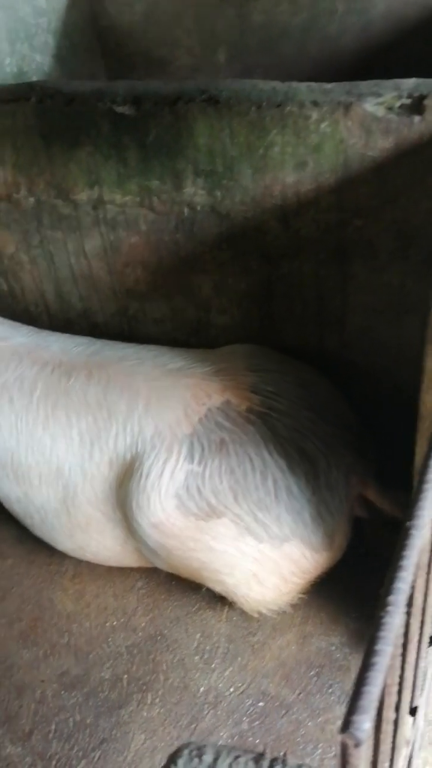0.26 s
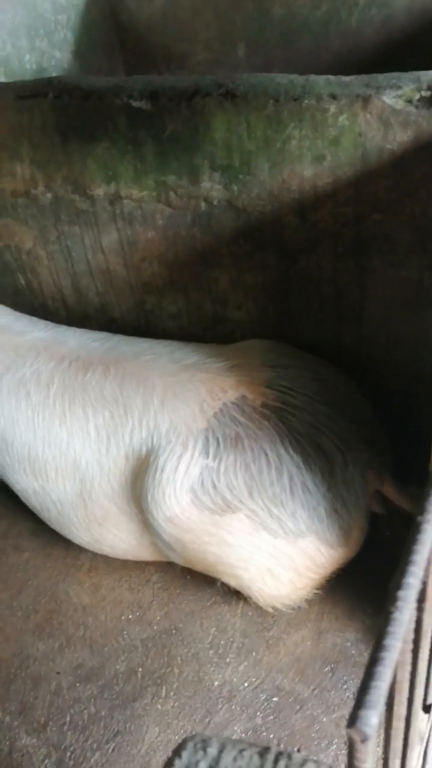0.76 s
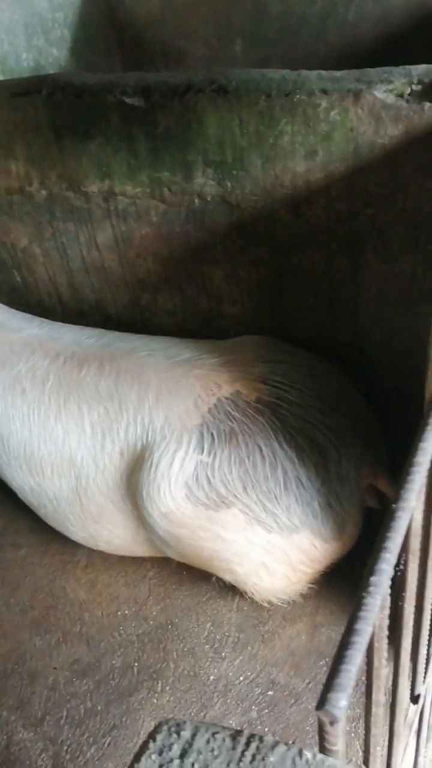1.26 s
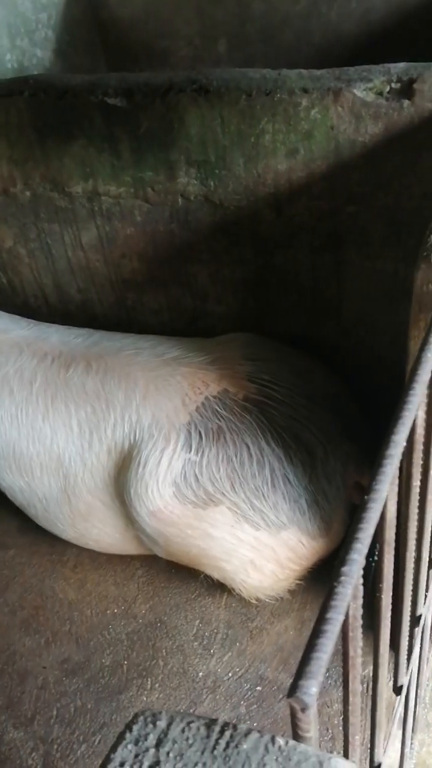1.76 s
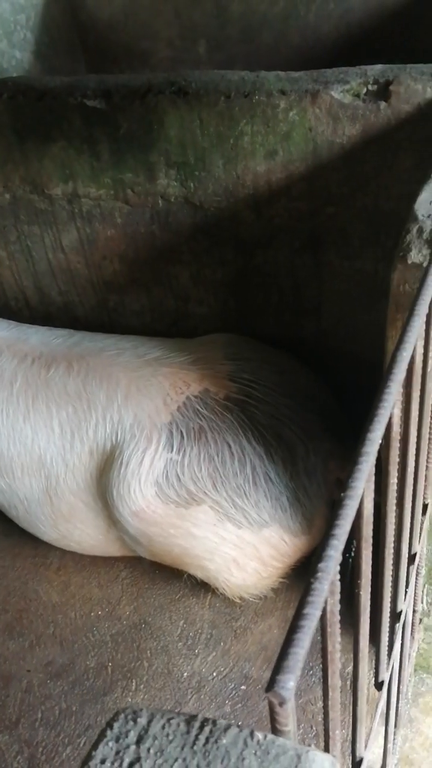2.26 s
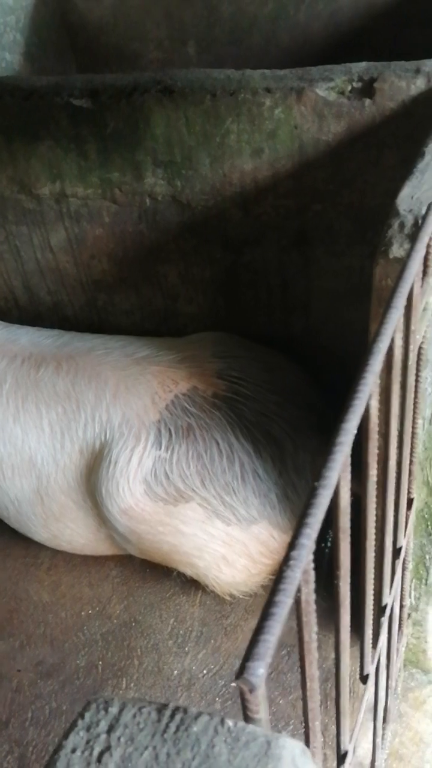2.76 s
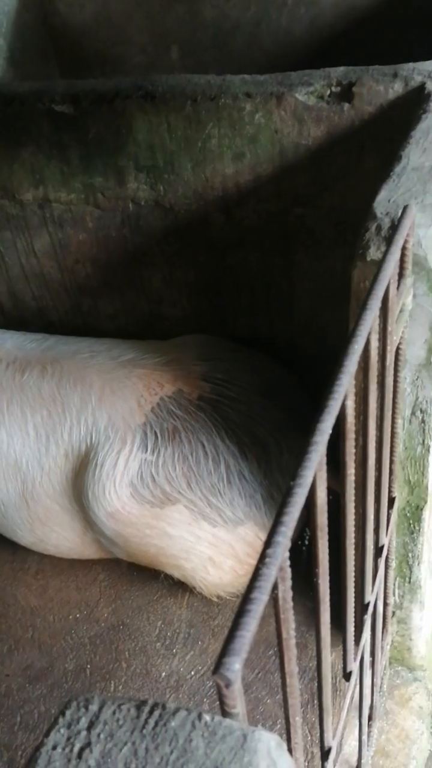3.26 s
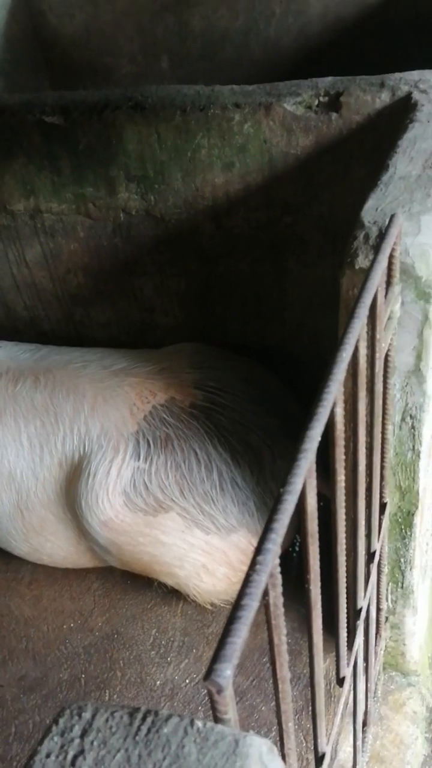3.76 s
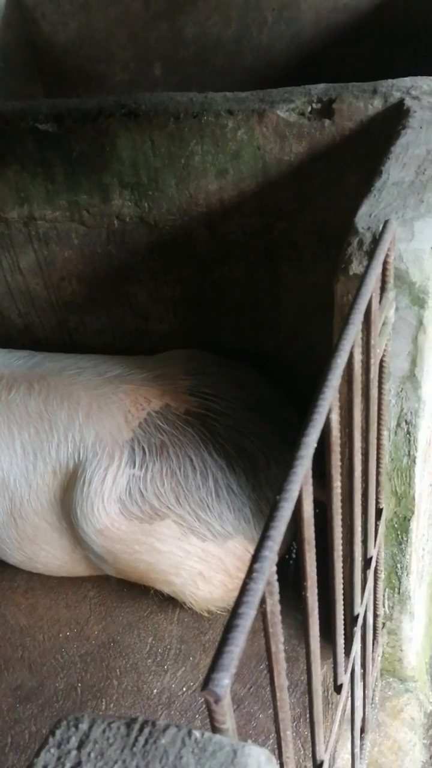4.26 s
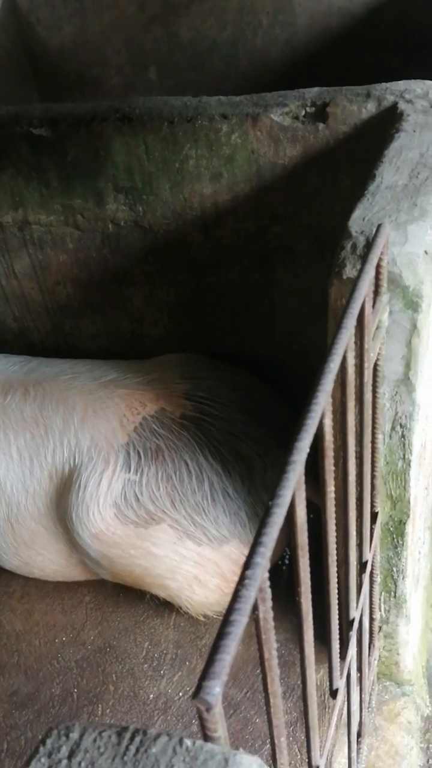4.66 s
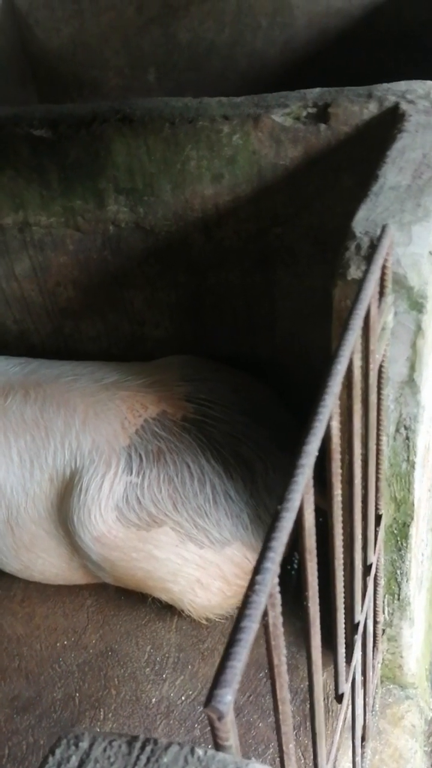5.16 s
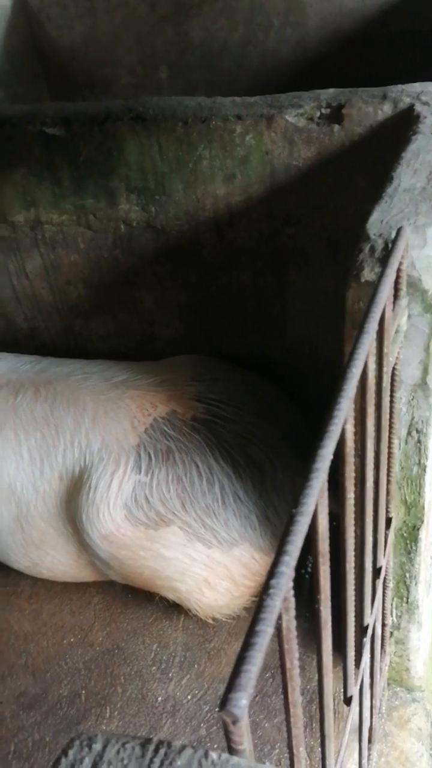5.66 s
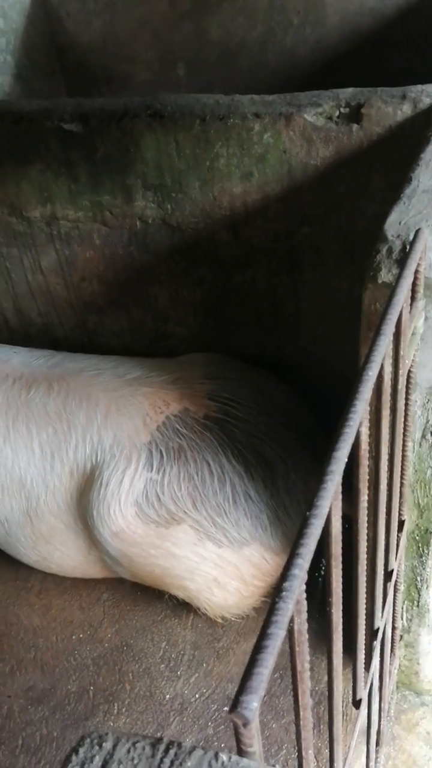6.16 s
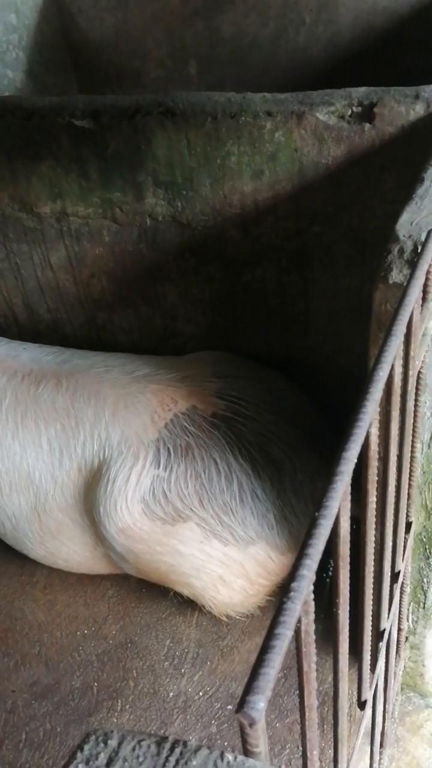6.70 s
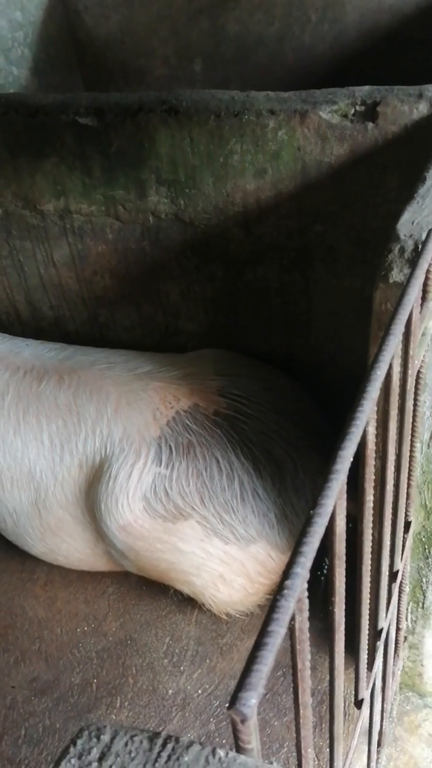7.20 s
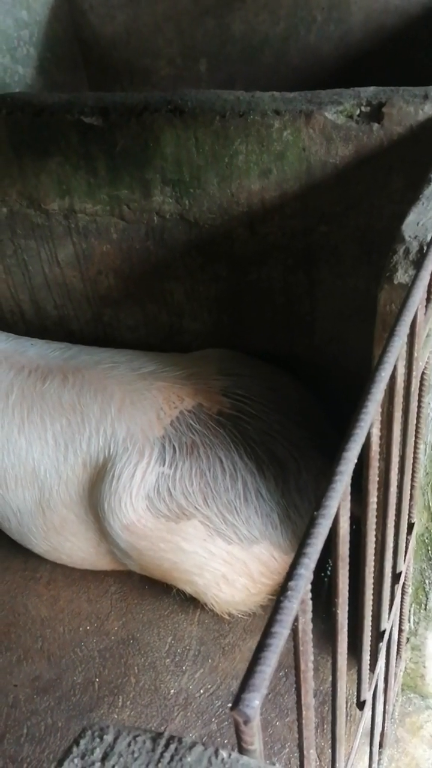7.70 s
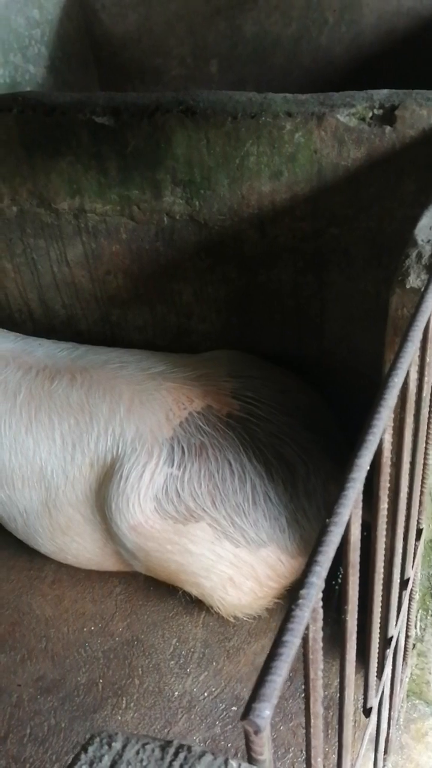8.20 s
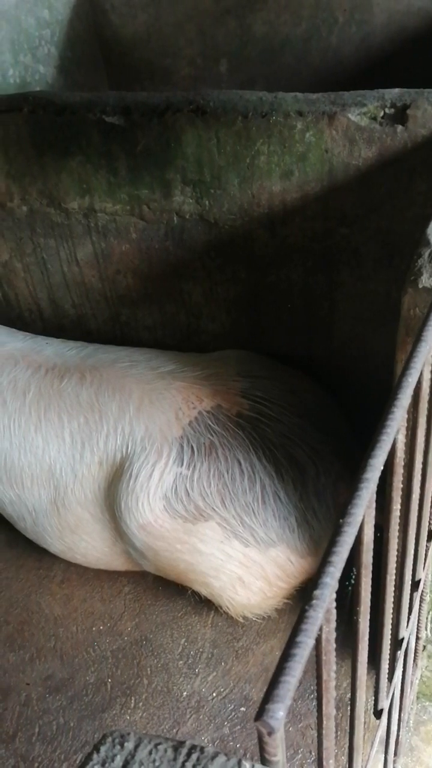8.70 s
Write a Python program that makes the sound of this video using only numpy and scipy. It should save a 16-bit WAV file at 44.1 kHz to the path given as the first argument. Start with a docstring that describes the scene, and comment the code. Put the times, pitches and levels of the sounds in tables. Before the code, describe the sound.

A high, crisp hiss of running water fills a concrete animal shed from start to finish, swelling gently about every three quarters of a second, with patter, dull splashing, sharp drops and small spits. Beneath is a low, restless air wash. Wet smacks and hollow gliding gulps from neighbouring pens come in loose clusters, busiest around 2.3 to 4.3 and 6 to 8.7 seconds. The close pig gives a short rattling grunt at 1.0, a duller closed-mouth one with a slight hum at 1.5, and another open one at 6.6, together with a strong water surge and splat. Hoarse squeals sound far off at 1.2, 2.6 and 7.5, with a thin whistling cry near 3.4. At 7.6 a young pig makes a quick rising tonal grunt that sinks into an airy murmur. A prominent gulp follows at 8.3. Short concrete reverberation, wide phone stereo.

```python
"""In a bare concrete pen a pig grunts three times: slow throat flaps, built from air bursts, ring mouth and snout.
From the pens around come gliding gulps, noisy wet smacks and low rumbles, and late on a young pig's tonal grunt.
Wavering tones make squeals and a whistle far off. Clicks and noise make a surging stream, spits and drops;
filtered noise washes through the shed. A phone's two unlike microphone ports colour left and right."""
import sys
import numpy as np
from scipy import signal
from scipy.fft import rfft, irfft, next_fast_len
from scipy.io import wavfile
from scipy.ndimage import uniform_filter1d

SR = 44100
rng = np.random.default_rng(int(sys.argv[2]) if len(sys.argv) > 2 else 0)


def inscribe(sig):
    """Save sig as 16-bit PCM at rate SR to the path in sys.argv[1].

    A 1-D sig is mono; a 2-D sig holds one channel per row.
    Samples are clipped to [-1, 1] before scaling.
    """
    pcm = np.round(np.clip(np.atleast_2d(sig).T, -1, 1) * 32767)
    wavfile.write(sys.argv[1], SR, pcm.astype(np.int16))


N = 394254
T = np.arange(N) / SR

# Spray colour. Each row: frequency in Hz, gain in dB.
SPRAY_COLOUR = [(1500, -20.5), (3500, 0.5), (5000, 5), (8000, 0), (12000, -3.5), (16000, 6.5)]
# Colour of the small splats. Each row: frequency in Hz, gain in dB.
PATTER_COLOUR = [(2500, -26), (4500, 10), (5600, 6), (7000, 2.5), (9000, -4.5), (16000, -10.5)]
# Colour of the dull splashing. Each row: frequency in Hz, gain in dB.
SPLASH_COLOUR = [(900, -16), (1700, -7), (2150, 0), (3200, -1), (4000, -12.5), (7000, -30)]
# The stream surges about every three quarters of a second. Each row: crest in seconds, rise in dB.
SURGES = [(0.48, 5.5), (1.35, 4), (2.08, 6), (2.92, 5), (3.72, 4), (4.58, 5.5), (5.25, 1.5), (5.97, 2.5),
          (6.68, 9.5), (7.4, 5), (8.08, 5), (8.849, 5)]
# Course of the dull splashing. Each row: time in seconds, relative level in dB.
SPLASH_LEVEL = [(0, -59), (0.1, -53), (0.55, -49), (0.72, -51), (1.5, -49), (1.75, -54.5), (2.65, -48.5),
                (2.85, -50.5), (3.2, -53.5), (4.45, -51), (4.8, -54.5), (5.35, -52), (5.55, -47),
                (5.85, -53), (6.55, -50), (7.08, -52.5), (7.45, -48), (7.75, -50.5), (8.22, -47),
                (8.5, -54)]
# Colour of the shed's air. Each row: frequency in Hz, gain in dB.
SHED_COLOUR = [(15, -8), (45, 6.5), (130, 3.5), (250, 0), (420, -3.5), (550, -11.5), (760, 1.5),
               (1050, -4.5), (1700, -7.5), (3500, -7.5), (9000, -54)]
# Hollow resonances of the pens. Each row: frequency in Hz, width in Hz, middle level in dB.
SHED_RINGS = [(545, 36, -68), (871, 26, -73.5), (1147, 48, -72.5), (1380, 40, -69), (2114, 96, -72.5)]
# Wet smacks, slurps and snuffles. Each row: start in seconds, relative level in dB, centre in Hz,
# nominal length in seconds, width as a share of the centre.
SMACKS = [(0, -51, 3000, 0.017, 0.54), (.48, -60, 2900, .14, .45), (.585, -54.5, 1000, 0.049, 0.55),
          (.845, -54.5, 2220, 0.11, 0.92), (1.22, -48, 580, 0.1, 1), (1.276, -45.5, 1925, .026, 0.11),
          (1.305, -54.5, 303, 0.062, 0.31), (1.98, -56.5, 2330, 0.055, 0.35),
          (2.095, -60, 2040, 0.06, 0.34), (2.25, -52.5, 1340, 0.044, 0.55), (2.3, -55.5, 2680, 0.018, .15),
          (2.57, -56, 2970, 0.05, 0.087), (2.72, -57.5, 2090, 0.096, 0.11), (2.81, -57.5, 2330, 0.13, 0.23),
          (2.994, -49.5, 2280, .05, 0.31), (3.745, -58, 3230, 0.034, .1), (4.0, -59.5, 2160, .06, 0.16),
          (4.36, -57.5, 2380, .07, 0.22), (4.505, -51, 2780, 0.11, 0.41), (4.74, -59, 1060, 0.13, 0.56),
          (5.075, -54, 3150, 0.076, 0.27), (5.4, -57, 2400, 0.037, 0.27), (5.53, -60, 2070, 0.06, 0.17),
          (5.68, -58, 3140, 0.064, 0.34), (5.876, -55, 2800, .049, 0.32), (6.09, -60, 1370, 0.11, 0.21),
          (6.605, -54, 1110, 0.072, 0.2), (6.85, -48.5, 780, 0.061, 1), (6.853, -54, 1900, 0.087, 1),
          (7.401, -49.5, 2720, 0.042, 0.12), (8.168, -58, 2620, 0.17, 0.42),
          (8.527, -54.5, 1230, 0.027, 0.33), (8.535, -58.5, 2380, .07, 0.27)]
# Faint low rumbles. Each row: the same columns as the smacks.
RUMBLES = [(3.0, -52.5, 150, 0.082, .7), (5.25, -58, 104, 0.32, 0.43), (5.42, -53.5, 101, 0.16, 0.43),
           (8.775, -51, 92, 0.055, 0.58)]
# Bouts of feeding. Each row: start in seconds, end in seconds.
BOUTS = [(0.06, 1.02), (2.35, 3.7), (6.0, 7.1), (7.45, 8.8)]
# The main gulps. Each row: time in seconds, relative level in dB, mouth note in Hz at mid-glide,
# whole glide in octaves, squelch in dB against the note.
GULPS = [(.09, -47.5, 529, 0.028, -22), (.275, -42, 606, -0.33, -10), (.541, -42.5, 540, 0.014, -12),
         (.92, -42, 470, 0.18, 7), (1.995, -43, 575, -0.43, 5), (2.377, -39, 810, -0.26, 7),
         (2.398, -41, 545, 0.01, -11), (2.462, -44, 710, 0.27, 0), (2.51, -39, 700, 0.22, -10),
         (2.679, -43.5, 547, -0.13, -3), (2.745, -48.5, 547, 0.31, -14), (3.021, -42, 541, 0, 1),
         (3.130, -37.5, 644, 0.33, -3), (3.345, -38.5, 552, 0.088, -22), (3.41, -47.5, 470, 0.26, -10),
         (3.487, -43.5, 568, 0.19, -14), (3.525, -43, 628, -0.067, -6), (3.6, -45, 903, 0.021, -12),
         (3.69, -46.5, 908, -0.0056, -5), (3.775, -42.5, 556, -0.02, -22), (4.037, -40.5, 514, .3, -5.5),
         (4.102, -42, 502, 0.37, -12), (4.272, -45.5, 550, 0.025, -22), (4.33, -50, 555, -0.13, -12),
         (5.501, -39.5, 540, 0.079, -15), (5.794, -40.5, 539, 0.083, -13), (6.18, -43.5, 610, 0.26, -6),
         (6.219, -41.5, 635, -0.2, 2), (6.282, -43, 532, -0.55, -2), (6.427, -43.5, 453, 0.33, 3),
         (6.585, -43.5, 540, -0.093, -1), (7.478, -46.5, 456, 0.45, -8), (7.81, -40, 892, 0.13, -8),
         (7.9, -42, 763, 0.34, -5), (7.925, -44, 560, .4, 6), (7.99, -40.5, 988, 0.087, -1),
         (8.145, -39.5, 682, 0.36, -2), (8.3, -32.5, 718, 0.3, -11.5), (8.431, -45, 574, -0.17, -11),
         (8.54, -50.5, 545, 0.016, -13), (8.665, -46.5, 645, 0.073, -4), (8.71, -50, 722, -0.081, -16)]
# The main drops. Each row: start in seconds, relative level in dB.
DROPS = [(0.0966, -38), (.160, -39.5), (0.345, -40), (0.429, -38), (.531, -37), (0.662, -38.5),
         (1.382, -37), (1.723, -42.5), (1.880, -40), (2.280, -42), (2.355, -39), (2.433, -43.5),
         (2.469, -37.5), (3.102, -42), (3.235, -38.5), (3.281, -40), (3.345, -39.5), (3.843, -37),
         (4.110, -42), (4.272, -39), (4.319, -40), (4.460, -40.5), (4.859, -38), (4.961, -42.5),
         (5.011, -36), (5.184, -44), (5.399, -38), (5.856, -38.5), (6.173, -36), (6.390, -38.5),
         (6.431, -39), (6.707, -32.5), (7.441, -35.5), (7.863, -39), (8.052, -36.5), (8.360, -43.5),
         (8.602, -37), (8.666, -37.5), (8.719, -39), (8.774, -36), (8.810, -33.5), (8.859, -36.5)]
# One table a grunt. Each row: time in seconds, flap rate in Hz, effort in dB, mouth opening 0-1,
# mouth resonance in Hz, snout buzz in dB.
GRUNTS = [
    [(1.008, 40.1, -11, 0.5, 2340, -22), (1.033, 38.1, -2.5, 1, 2300, -32),
     (1.059, 34.9, -1.5, 0.84, 2120, -28), (1.116, 35.26, -0.5, 0.97, 1860, -1.5),
     (1.144, 47.6, -4.5, 0.6, 1930, 1.5), (1.173, 48.5, -8, .8, 1920, 0)],
    [(1.515, 30, -22, 0, 1700, -10), (1.548, 29.13, -9, 0, 1650, 1), (1.582, 32.93, 1.5, 0.06, 1600, 1.5),
     (1.613, 33.8, 1, 0.06, 1570, 3.5), (1.648, 34.9, -21, .1, 1585, 8)],
    [(6.631, 42, -16, 0.9, 2210, -24), (6.655, 31.82, -8.5, 0.66, 2080, -30),
     (6.686, 31.98, -4, 0.97, 2020, -28), (6.746, 36.72, -1.5, 0.86, 1680, 1.5),
     (6.773, 52, -3.5, 0.7, 1820, 3.5), (6.798, 52, -11, 0.2, 1900, -11)],
]
# Air between the throat folds. Each row: frequency in Hz, gain in dB.
FLAP_AIR = [(100, -8.5), (450, -5.5), (1000, 5.5), (2400, 8.5), (3400, 5.5), (3900, -4.5)]
# Slap of the closing folds. Each row: frequency in Hz, gain in dB.
FLAP_SLAP = [(25, 5), (60, -1.5), (200, -0.5), (550, 2), (1100, -4.5), (2500, -13)]
# Throat with the mouth shut. Each row: frequency in Hz, width in Hz, gain in dB.
SHUT = [(64, 25, 8.5), (127, 62, 2), (204, 43, 0.5), (377, 113, 4.5), (495, 170, 0), (1037, 130, -2),
        (1280, 140, -19), (1520, 83, -11.5), (2400, 4200, -52)]
# Throat with the mouth open. Each row: frequency in Hz, width in Hz, gain in dB.
OPEN = [(42, 15, -2.5), (122, 53, 1), (211, 50, -2.5), (416, 170, 0), (545, 203, 5.5), (1010, 195, -4),
        (1540, 560, -16), (2570, 650, -26), (5670, 1200, -35)]
# Snout resonance with the mouth shut. The one row: frequency in Hz, width in Hz, base gain in dB.
SNOUT = (3210, 243, -11.5)
# First echoes off the pen walls. Each row: delay in milliseconds, gain in dB.
WALLS = [(7.2, -18), (9.3, -14), (15.8, -16.5)]
# Far squeals, one table each. Each row: time in seconds, middle pitch in Hz, relative level in dB,
# roughness, about 0-1.
SQUEALS = [
    [(1.22, 905, -59, .8), (1.30, 885, -49, 0.7), (1.365, 858, -48.5, 0.47), (1.42, 892, -54, 0.62),
     (1.48, 880, -50, 0.31), (1.54, 890, -53, 0.5), (1.60, 868, -52, .4)],
    [(2.56, 880, -68, 0.48), (2.66, 900, -57, 0.48), (2.73, 925, -62, 0.84), (2.80, 905, -55, 0.59),
     (2.89, 885, -55.5, 0.72), (2.99, 868, -50.5, 0.76), (3.11, 840, -66, 1.1)],
    [(7.50, 875, -70, 0.27), (7.53, 878, -51, 0.5), (7.59, 880, -64, .3), (7.61, 890, -67, .5)],
]
# Partials of a squeal. Each row: multiple of the pitch, gain in dB.
SQUEAL_ORDERS = [(1, -2.5), (2, -0.5)]
# A far, thin whistling cry. Each row: time in seconds, middle pitch in Hz, relative level in dB.
WHISTLE = [(3.15, 1480, -72), (3.24, 1497, -59), (3.34, 1504, -44), (3.395, 1494, -52), (3.44, 1490, -40.5),
           (3.50, 1478, -57), (3.55, 1462, -56), (3.64, 1435, -59), (3.68, 1440, -71), (3.73, 1434, -65),
           (3.85, 1410, -87)]
# Hum at the start of the second grunt. Each row: time in seconds, middle pitch in Hz, level in dB.
HUM = [(1.508, 112, -48), (1.521, 122, -37), (1.542, 133, -42), (1.556, 140, -34), (1.582, 146, -39)]
# Spits of the stream. Each row: start in seconds, level in dB, length in seconds.
SPITS = [(1.879, -50, .008), (2.126, -48, 0.066), (2.397, -44.5, 0.0085), (3.599, -50, 0.071),
         (5.707, -49.5, .008), (6.028, -47, .005), (6.167, -49, 0.0072), (6.637, -47, .007)]
# A young pig's short grunt. Each row: time in seconds, middle pitch in Hz, level in dB,
# air in dB against the tone's scale.
YOUNG = [(7.608, 158.5, -61, -18), (7.63, 216.3, -38.5, -30), (7.648, 240.5, -27, -32),
         (7.668, 257.3, -32.5, -22), (7.70, 250, -44.5, -1.5), (7.75, 216, -60.5, 4.5),
         (7.80, 150, -49, -8), (7.86, 134, -64, 13)]
# The young pig's throat. Each row: frequency in Hz, width in Hz, gain in dB.
YOUNG_THROAT = [(150, 124, 5), (245, 86, -6), (512, 100, -3), (734, 100, -14), (1000, 130, -20),
                (1480, 170, -13), (1900, 900, -33)]
# Microphone ports. Each row: frequency in Hz, left gain in dB, right gain in dB.
PORTS = [(60, -2, 0.5), (250, -3.5, 0.5), (650, 1, -0.6), (1300, -4, 1.5), (2400, -6.5, 1.5),
         (3440, -4, 4.5), (4437, -4, 3), (5414, 2.5, 18.5), (6830, 0.5, 7.5), (7840, 3.5, -2),
         (8700, 4.5, 2), (9900, 7.5, 2), (12500, 5.5, 3.5), (14500, -2.5, 1.5)]

SPRAY_DB, SURGE_S = -54.5, 0.14  # relative level between surges; time from crest to 1/e of the rise
GULP_HZ, GULP_T60_S = 540, 0.069  # usual note and the time it takes to ring down 60 dB
GULP_DAMPING = 0.65  # higher notes ring shorter by this power
GULP_GLIDE_S = 0.017  # time constant of the glide
CHEWS_PER_S = 6  # in a bout, all the mouths together
SNOUT_SAG_HZ, SNOUT_DAMPING = 130, 2.6  # an open mouth lowers and widens the snout's resonance
TOP_HZ = 15800


def undb(db):
    """Decibels to gain."""
    return 10 ** (np.asarray(db) / 20)


def unit(x):
    """Scale to rms 1."""
    return x / np.sqrt(np.mean(x ** 2) + 1e-20)


def add(out, s, x):
    """Mix x into out from time s."""
    i = max(int(s * SR), 0)
    out[i:i + len(x)] += x[:len(out) - i]


def curves(rows):
    """The columns of a table as continuous controls."""
    s, *columns = np.transpose(rows)
    return [np.interp(T, s, c) for c in columns]


def gate(rows):
    """Open, with soft edges, between the first and last row of a table."""
    is_open = 1. * ((T > rows[0][0]) & (T < rows[-1][0]))
    return uniform_filter1d(is_open, size=400)


def walk(rate):
    """Random drift with a spread near 1, taking a new value rate times a second."""
    rate = np.clip(rate, .1, 2000)
    return 1.2 * np.interp(T * rate, np.arange(18000), rng.standard_normal(18000))


def shape(x, gain):
    """Causal filter with the magnitude gain(frequency), made minimum-phase by folding its cepstrum."""
    n = next_fast_len(x.shape[-1] // 2 + 1, True) * 2
    cepstrum = irfft(np.log(gain(np.arange(n // 2 + 1) * SR / n) + 1e-5))
    cepstrum[1:n // 2] *= 2
    cepstrum[n // 2 + 1:] = 0
    return irfft(rfft(x, n) * np.exp(rfft(cepstrum)))[..., :x.shape[-1]]


def colour(x, points):
    """Filter by (Hz, dB) points."""
    hz, db = np.transpose(points)
    return shape(x, lambda f: undb(np.interp(np.log(f + 1), np.log(hz), db)))


def resonances(f, modes):
    """Gain of steep-sided (Hz, width, dB) resonances."""
    peaks = (undb(db) / (1 + (2 * (f - hz) / width) ** 2) for hz, width, db in modes)
    return np.sqrt(sum(peak ** 2 for peak in peaks))


def diffuse(n, apart_hz=800):
    """Sound from all sides at two ports: alike in the bass, unrelated in the treble."""
    alike = np.sinc(np.fft.rfftfreq(n, 1 / SR) / apart_hz)
    balance = np.sqrt([(1 + alike) / 2, (1 - alike) / 2])
    mid, side = irfft(rfft(rng.standard_normal((2, n))) * balance, n)
    return np.array([mid + side, mid - side])


def pen(x, lag_ms, wet_db, t60, build_s=0.0052):
    """Direct sound (right port later by lag_ms) and concrete's ring; deep bass escapes over the low walls."""
    t = T[:SR]
    response = diffuse(SR) * undb(-60 * t / t60) * np.clip(t / build_s, 0, 1)
    response = colour(response, [(50, -9.5), (250, -0.5)])
    response *= undb(wet_db) / np.sqrt(np.sum(response ** 2) / 2)
    for channel, lag in enumerate([-lag_ms, lag_ms]):
        response[channel, int(max(lag, 0) * SR / 1000)] += 1
    return signal.fftconvolve(x[None], response)[:, :N]


def spread(source, lag_ms=.5, shared=0.19):
    """A wide source: each port hears its own splashes, and a common part reaches the right port later."""
    common, left, right = source(), source(), source()
    direct = np.array([common, np.roll(common, int(lag_ms * SR / 1000))])
    return np.sqrt(shared) * direct + np.sqrt(1 - shared) * np.array([left, right])


def crackle(n, rate, spread_db):
    """Tiny wet clicks of very unequal size, about rate of them a second."""
    place, size = rng.random(n), np.minimum(rng.exponential(size=n), 4)
    return unit((place < rate / SR) * undb(spread_db * size) * rng.standard_normal(n))


def scatter(count, level_db, spread_db):
    """Events loosely spaced all through, as (s, dB, a random share 0-1)."""
    return [((k + late) * T[-1] / count, level_db + spread_db * (2 * size - 1), share)
            for k, (late, size, share) in enumerate(rng.random((count, 3)))]


def flow():
    """Relative level of the spray in dB: steady, with a smooth hump for each surge."""
    return SPRAY_DB + sum(rise_db * np.exp(-((T - s) / SURGE_S) ** 2) for s, rise_db in SURGES)


def water(spray_db=-4, splash_db=-3, patter_rate=70, patter_s=0.014, patter_db=-9, flicker_db=1.0, slosh_db=2):
    """A running stream: fine spray, small splats at random, and a duller splashing below."""
    low_db, = curves(SPLASH_LEVEL)
    spray = unit(colour(spread(lambda: crackle(N, 12000, 1.7)), SPRAY_COLOUR))
    spray = spray * undb(spray_db + flicker_db * walk(25))
    # each random click opens a burst of noise that dies away over patter_s
    clicks = np.abs(crackle(N, patter_rate, 0.72))
    splats = unit(signal.lfilter([1], [1, -np.exp(-1 / (patter_s * SR))], clicks))
    patter = spread(lambda: rng.standard_normal(N)) * splats
    patter = unit(colour(patter, PATTER_COLOUR)) * undb(patter_db)
    splashing = unit(colour(spread(lambda: crackle(N, 3000, 1.8)), SPLASH_COLOUR))
    splashing = splashing * undb(low_db + splash_db + slosh_db * walk(18))
    return (spray + patter) * undb(flow()) + splashing


def shed(level_db=-57, stir_db=3.0, ring_stir_db=3):
    """The low, restless wash of a shed full of animals; hollow resonances come and go in it."""
    out = unit(colour(diffuse(N), SHED_COLOUR)) * undb(level_db + stir_db * walk(14))
    air = diffuse(N)
    for hz, width, db in SHED_RINGS:
        ring = unit(shape(air, lambda f: resonances(f, [(hz, width, 0)])))
        out += ring * undb(db + ring_stir_db * walk(9))
    return out


def swells(rows, level_db, fizz_db):
    """Smacks or rumbles: each a brief swell of dense clicks in one resonance, over a broad fizz."""
    out, t = np.zeros(N), T[:16384]
    for s, db, hz, length, width in rows:
        modes = [(hz, width * hz, 0), (3000, 4000, fizz_db)]
        clicks = unit(shape(crackle(len(t), 3500, 2.9), lambda f: resonances(f, modes)))
        age = t / (0.18 * length)
        swell = (age * np.exp(1 - age)) ** 0.48
        add(out, s, undb(db + level_db) * clicks * swell)
    return out


def chews(level_db=-53, spread_db=3, low_hz=500, rise_hz=350, idle_db=-52, count=24):
    """Soft gulps as (s, dB, Hz): a loose rhythm during each bout, and others at any time."""
    beats = np.concatenate([np.arange(start, end, 1 / CHEWS_PER_S) for start, end in BOUTS])
    late, size, wide = rng.random((len(beats), 3)).T
    times = beats + late / (2 * CHEWS_PER_S)
    busy = zip(times, level_db + spread_db * (2 * size - 1), low_hz + rise_hz * wide ** 2)
    idle = [(s, db, low_hz + rise_hz * share ** 2) for s, db, share in scatter(count, idle_db, spread_db)]
    return list(busy) + idle


def gulps(level_db=-4.5, rise_s=0.01101, wet_width=0.49, upper_db=-10, waver=0.023):
    """A swallow: the mouth cavity rings and glides as it changes shape, with a squelch around its note."""
    out, t = np.zeros(N), T[:8192]
    faint = [(s, db, hz, 0.264 * rng.standard_normal(), -6) for s, db, hz in chews()]
    for s, db, hz, glide, wet_db in list(GULPS) + faint:
        wobble = np.interp(t, t[::256], rng.standard_normal(32))
        pitch = hz * 2 ** (glide * (.5 - np.exp(-t / GULP_GLIDE_S))) * (1 + waver * wobble)
        note = np.sin(2 * np.pi * np.cumsum(pitch) / SR)
        modes = [(hz * 1.116, wet_width * hz, 0), (hz * 2.0, 500, upper_db)]
        squelch = unit(shape(rng.standard_normal(len(t)), lambda f: resonances(f, modes)))
        t60 = max(GULP_T60_S * (GULP_HZ / hz) ** GULP_DAMPING, .02)
        swell = (1 - np.exp(-t / rise_s)) ** 2 * undb(-60 * t / t60)
        gulp = unit(note + undb(wet_db) * squelch) * swell / swell.max()
        add(out, s - rise_s / 2, undb(db + level_db) * gulp)
    return out


def drops(level_db=1, decay_s=0.0087, tail_db=-18, tail_s=0.2, rebound_db=-13, rebound_s=.08):
    """Drops slap the wet floor and throw up droplets that land just after; the tiniest tick very brightly."""
    out, t = np.zeros(N), T[:8192]
    large = [(s, db, -17) for s, db in DROPS]  # the third value is the treble in dB
    small = [(s, db, -17) for s, db, _ in scatter(16, level_db=-48, spread_db=3)]
    tiny = [(s, db, 5) for s, db, _ in scatter(16, level_db=-52, spread_db=3)]
    for s, db, bright_db in large + small + tiny:
        landings = rebound_s * rng.random(size=3)
        droplets = sum(np.exp(-np.abs(t - late) / decay_s) * (t > late) for late in landings)
        tail = undb(tail_db) * np.exp(-t / tail_s)
        envelope = np.sqrt(np.exp(-2 * t / decay_s) + (undb(rebound_db) * droplets) ** 2 + tail ** 2)
        slap = rng.standard_normal(len(t)) * envelope
        points = [(1200, -23), (3000, -2), (5500, -3.0), (8500, bright_db), (15000, bright_db)]
        add(out, s, undb(db + level_db) * colour(slap, points))
    return out


def flap(effort_db, opening, mouth_hz, snout_db):
    """A round push of air parts the throat folds, they slap shut, and wet air rasps into mouth and snout."""
    air_db, air_s, slap_s = 2, 0.0063, 0.004624
    push_db, dulling = -30, 0.25
    t = T[:4096]
    air = crackle(len(t), 9000, 2.2) * (t / air_s) ** 1.47 * np.exp(-t / air_s)
    source = colour(air * undb(air_db) / np.sqrt(np.sum(air ** 2)), FLAP_AIR)
    add(source, slap_s, colour(1. * (t == 0), FLAP_SLAP))
    # weak flaps close gently and sound dull: the push counts for more in them
    source = colour(source, [(130, 0), (400, 3.5 + dulling * effort_db / 3), (1200, dulling * effort_db)])
    push = np.sin(np.pi * np.minimum(t / slap_s, 1)) ** 2
    add(source, 0, -undb(push_db - 0.13 * effort_db) * push)

    opening = np.clip(opening, 0, 1)
    mouth = OPEN + [(mouth_hz, 500, -5.0)]
    hz, width, db = SNOUT
    snout = [(hz - SNOUT_SAG_HZ * opening, width * (1 + SNOUT_DAMPING * opening), db + snout_db - 4 * opening)]
    stretch = 1 + .012 * rng.standard_normal()  # the throat's shape varies from flap to flap

    def tract(f):
        throat = (1 - opening) * resonances(f * stretch, SHUT) + opening * resonances(f * stretch, mouth)
        return throat + resonances(f, snout)

    return shape(source, tract)


def resting_pig(level_db=10.3):
    """Each grunt is a short run of slow flaps, paced and powered by the breath."""
    out = np.zeros(N)
    for rows in GRUNTS:
        times, *columns = np.transpose(rows)
        s = times[0]
        while s <= times[-1]:
            rate, effort_db, opening, mouth_hz, snout_db = (np.interp(s, times, c) for c in columns)
            add(out, s, undb(level_db + effort_db) * flap(effort_db, opening, mouth_hz, snout_db))
            s += 1 / max(rate, 10)
    return out


def walls(x):
    """The walls close around the pig throw each flap back and fill the gaps between flaps."""
    return x + sum(undb(db) * np.interp(T - ms / 1000, T, x, left=0) for ms, db in WALLS)


def far_cries(waver=0.0725, whistle_waver=0.007, flutter_db=3):
    """Hoarse squeals and one thin whistle from distant pens: tones with an unsteady pitch and level."""
    out = np.zeros(N)
    for rows in SQUEALS:
        hz, db, rough = curves(rows)
        phase = 2 * np.pi * np.cumsum(hz * (1 + waver * rough * walk(400))) / SR
        squeal = sum(undb(k_db) * np.sin(k * phase) for k, k_db in SQUEAL_ORDERS)
        out += squeal * undb(db) * gate(rows)
    hz, db = curves(WHISTLE)
    phase = 2 * np.pi * np.cumsum(hz * (1 + whistle_waver * walk(150))) / SR
    out += np.sin(phase) * undb(db) * gate(WHISTLE)
    return out * undb(flutter_db * walk(40))


def hum(jitter=0.031, third_db=-15):
    """With the mouth shut, the folds hum softly into the second grunt: a tone and its third harmonic."""
    hz, db = curves(HUM)
    phase = 2 * np.pi * np.cumsum(hz * (1 + jitter * walk(150))) / SR
    return (np.sin(phase) + undb(third_db) * np.sin(3 * phase)) * undb(db) * gate(HUM)


def spits():
    """Now and then the stream spits a short, bright spray: noise under a half-sine swell."""
    out, t = np.zeros(N), T[:4096]
    for s, db, length in SPITS:
        points = [(3000, -19), (6000, -8.0), (8000, -3.0), (15000, -5)]
        spit = unit(colour(rng.standard_normal(len(t)), points))
        add(out, s, undb(db) * spit * np.sin(np.pi * np.minimum(t / length, 1)))
    return out


def young_pig(jitter=0.0223):
    """A clear, rising grunt of throat harmonics that sinks into a low, airy murmur of the snout."""
    hz, db, air_db = curves(YOUNG)
    hz = hz * (1 + jitter * walk(200))
    phase = 2 * np.pi * np.cumsum(hz) / SR
    on = gate(YOUNG) > 1e-6
    tone = np.zeros(N)
    tone[on] = sum(resonances(k * hz[on], YOUNG_THROAT) * np.cos(k * phase[on]) for k in range(1, 10))
    air = unit(colour(rng.standard_normal(N), [(200, 4), (700, 12.0), (1600, 10.0), (3000, -39)]))
    return (tone + undb(air_db) * air) * undb(db) * gate(YOUNG)


def scene():
    """The near pig, its neighbours, the water and the shed."""
    mouths = swells(SMACKS, level_db=7.5, fizz_db=-30.0) + gulps()
    rumbles = swells(RUMBLES, level_db=-3.5, fizz_db=-57)
    feeding = pen(mouths + rumbles, lag_ms=0.46, wet_db=1.0, t60=0.24)
    head_right_db = 1.34  # the pig's head lies to the right: right up, left down by this much
    near = pen(walls(resting_pig()) + hum(), lag_ms=-0.38, wet_db=-1.5, t60=0.27, build_s=0.015)
    near = near * undb([[-head_right_db], [head_right_db]])
    far = pen(far_cries(), lag_ms=0.14, wet_db=-1.5, t60=1.0)
    young = pen(young_pig(), lag_ms=-.1, wet_db=-7.5, t60=0.72)
    wet_floor = water() + spread(drops) + spread(spits)
    return wet_floor + shed() + feeding + near + far + young


def record(dry):
    """Each port has its own resonances; the top is cut."""
    hz, left, right = np.transpose(PORTS)
    heard = np.array([colour(x, np.transpose([hz, db])) for x, db in zip(dry, (left, right))])
    top_cut = signal.ellip(10, .1, 60, TOP_HZ, fs=SR, output="sos")
    return signal.sosfiltfilt(top_cut, heard)


dry = scene()
out = record(dry)
inscribe(out)
```